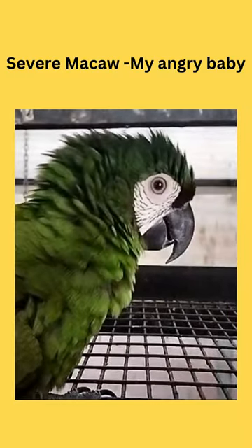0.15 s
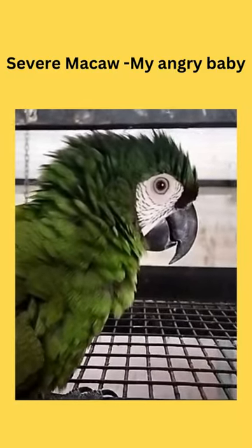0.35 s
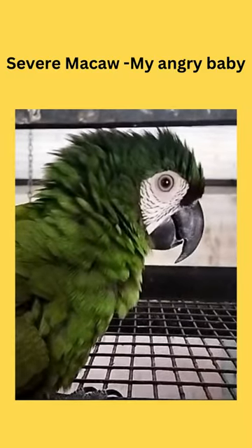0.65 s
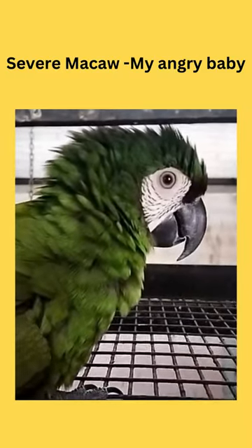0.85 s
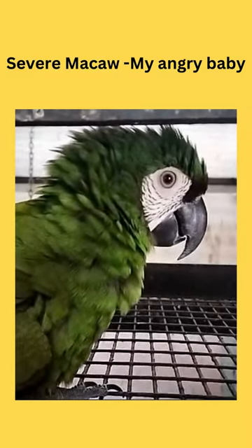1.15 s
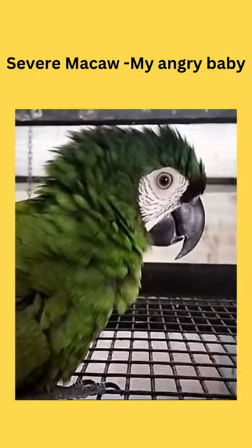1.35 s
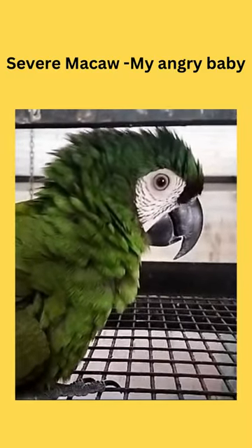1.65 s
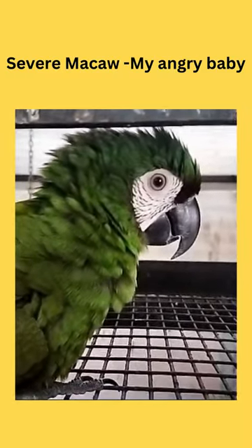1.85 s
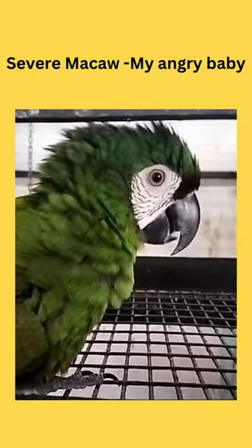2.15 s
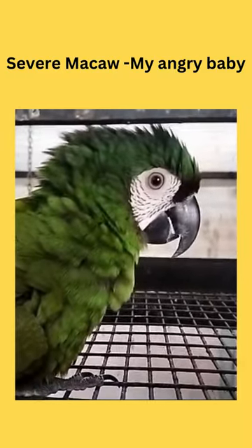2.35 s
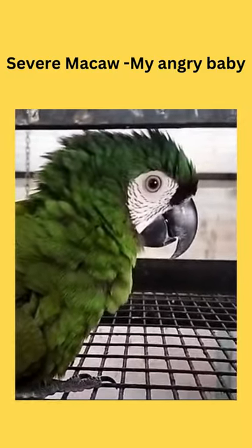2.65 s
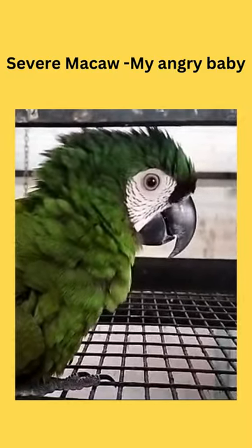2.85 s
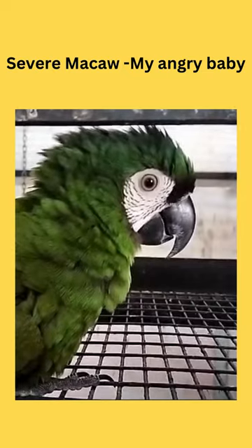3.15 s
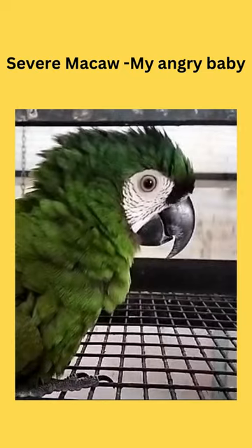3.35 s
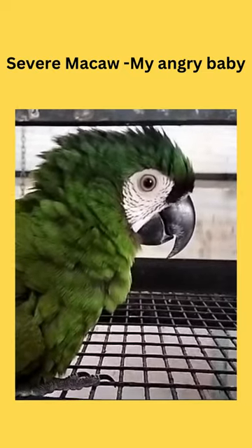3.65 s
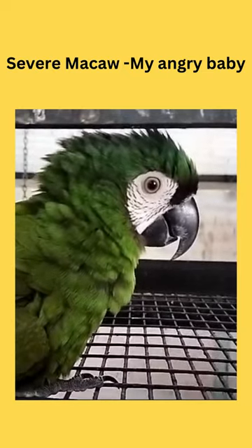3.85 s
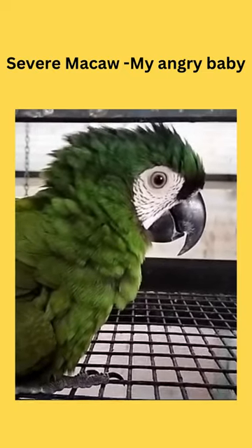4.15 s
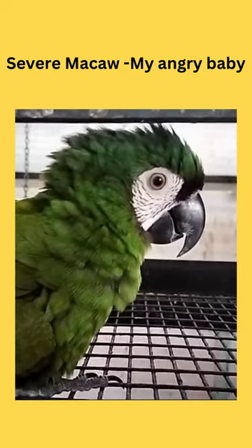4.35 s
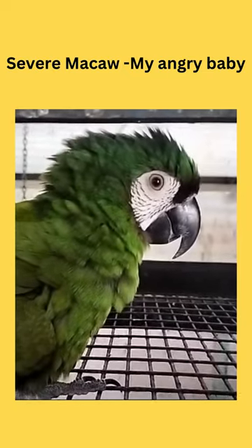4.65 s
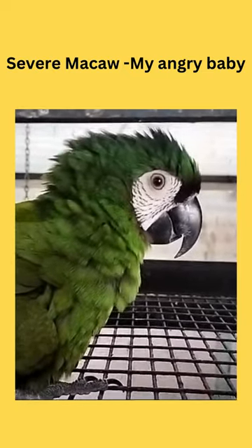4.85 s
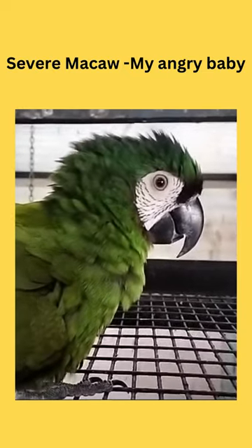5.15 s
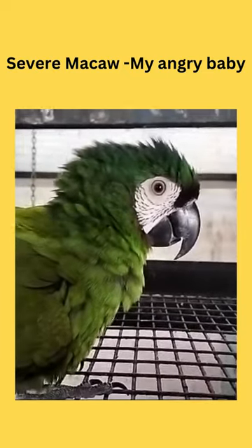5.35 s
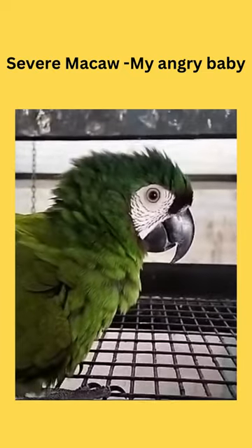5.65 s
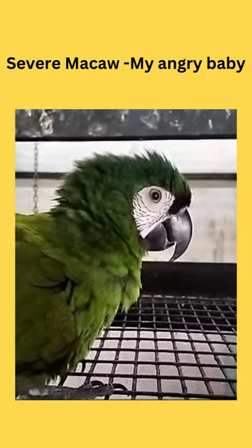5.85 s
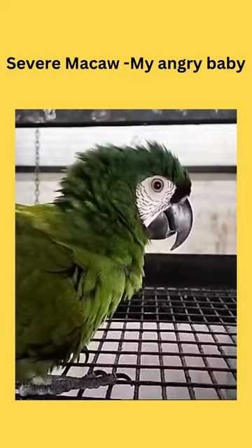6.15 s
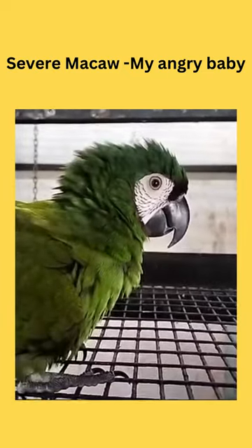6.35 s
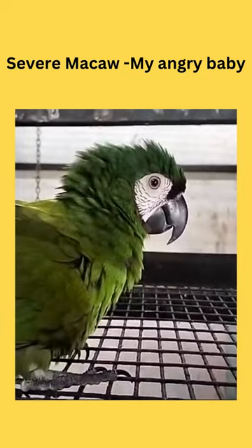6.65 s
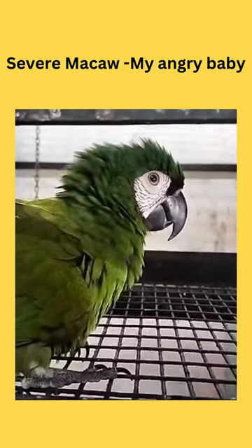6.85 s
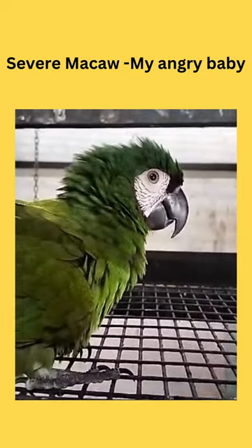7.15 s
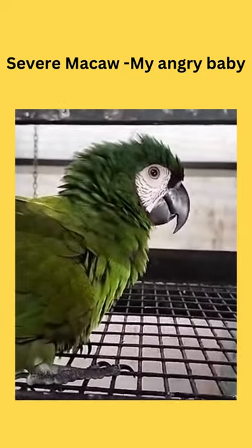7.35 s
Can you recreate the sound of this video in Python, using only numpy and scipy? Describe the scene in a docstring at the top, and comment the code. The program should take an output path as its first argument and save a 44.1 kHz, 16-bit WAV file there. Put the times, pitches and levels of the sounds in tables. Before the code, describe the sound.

Short, hoarse bird screeches come from across a hard-walled room from the start and recur throughout, over a low rumble and faint hiss. A macaw close to the microphone answers with harsh rasps from 0.3 seconds, then a loud yelp and shrill screech near 0.9. It gives a brief rattle at 1.4 seconds, squawks loudly again at 1.9 and follows with nasal croaks just after 2. Another sharp squawk lands at about 3.3 seconds, then quieter rasps and distant calls fill the gap until more croaks at 5. Loud rasps and screeches cluster from 5.4 to 5.9 and from 6.5 to 6.9 seconds, and weaker calls carry on to the end at about 7.5. Soft puffs of air bump the left side of the microphone near 2, 3.3, 5.9 and 6.8 seconds. The room rings briefly after every call.

```python
"""A macaw screeches across a hard-walled room, over low rumble and faint hiss. The near bird, on its wire
cage just before the microphones, answers: its membranes go chaotic in rasps, then yelp and screech.
At 1.4 s its voice slows to a rattle; at 2 s air bumps the left mic, and nasal croaks follow, again at 5 s.
Near and far birds squawk on to the end. The room rings after every call, and the recorder ducks the
rumble after the loudest ones."""
import sys
import numpy as np
from scipy import signal
from scipy.fft import rfft, irfft, next_fast_len
from scipy.io import wavfile
from scipy.ndimage import uniform_filter1d, minimum_filter1d, map_coordinates

SR = 44100
rng = np.random.default_rng(int(sys.argv[2]) if len(sys.argv) > 2 else 0)


def transcribe(signal):
    """Save signal, clipped to [-1, 1], as a 16-bit WAV file at the path in sys.argv[1]."""
    frames = np.atleast_2d(signal).T
    limited = np.clip(frames, -1, 1)
    pcm = np.round(limited * 32767).astype(np.int16)
    wavfile.write(sys.argv[1], SR, pcm)


N = 331632


def amp(db):
    """Decibels to gain."""
    return 10 ** (np.asarray(db) / 20)


def unit(x):
    """Scale to rms 1."""
    return x / np.sqrt(np.mean(x ** 2) + 1e-20)


def along(points, hz):
    """Read (frequency, value) breakpoints on a log axis."""
    f, v = np.transpose(points)
    return np.interp(np.log(hz + 1), np.log(f + 1), v)


def glide(first, last, progress):
    """A linear ramp over the course of a call."""
    return first + (last - first) * progress


def wobble(rate, size):
    """A smooth random modulator with rate knots a second."""
    knots = rng.standard_normal(8192)
    return map_coordinates(knots, [np.arange(size) * rate / SR], mode="wrap")


def filtered(x, response):
    """Filter x by a gain given as a function of frequency."""
    size = x.shape[-1]
    padded = next_fast_len(size + 4096)
    return irfft(rfft(x, padded) * response(np.fft.rfftfreq(padded, 1 / SR)), padded)[..., :size]


def coloured(x, spectrum):
    """x through an EQ curve, at rms 1."""
    return unit(filtered(x, lambda hz: amp(along(spectrum, hz))))


def add(track, start, x):
    """Mix x into the track at a time."""
    part = track[round(start * SR):][:len(x)]
    part += x[:len(part)]


def call(start, rise, fall, swell_db, edge=.008):
    """A call's times, soft gate, 0-1 progress and dB swell; swell_db is (start, end) under the peak."""
    peak, end = start + rise, start + rise + fall
    t = np.arange(max(int((start - edge) * SR), 0), min(int((end + edge) * SR), N)) / SR
    gate = np.sqrt(np.clip(np.minimum(t - start + edge, end + edge - t) / (2 * edge), 0, 1))
    progress = np.interp(t, [start, end], [0, 1])
    swell = np.interp(t, [start, peak, end], [-swell_db[0], 0, -swell_db[1]])
    return t, gate, progress, swell


def cycles(pitch, jitter, jitter_rate, waver, waver_rate):
    """Phase of a membrane whose pitch trembles quickly and wavers more slowly."""
    drift = jitter * wobble(jitter_rate, len(pitch)) + waver * wobble(waver_rate, len(pitch))
    return 2 * np.pi * np.cumsum(pitch * np.exp(drift)) / SR


def flutter(rate, depth_db, size):
    """Uneven tremolo of the air stream, at rms 1."""
    phase = 2 * np.pi * np.cumsum(rate * np.exp(0.418 * wobble(rate, size))) / SR
    return unit(amp(depth_db * (np.sin(phase) + 0.47 * wobble(2 * rate, size))))


def brightened(x, treble_db, split_hz):
    """Ride the treble of x against its body, as the beak opens and closes."""
    high = filtered(x, lambda hz: 1 - 1 / (1 + (hz / split_hz) ** 12))
    return unit(x - high) + amp(treble_db) * unit(high)


# stereo image of diffuse sound: f/Hz, left-right correlation
CORRELATION = [(50, 0.73), (150, 1), (700, 0.52), (1500, -0.23), (3500, -0.13), (6000, 0.84), (12000, 0.82)]

def diffuse_stereo(pair):
    """Two unrelated signals, as mid and side, become a partly alike left and right."""
    def weights(hz):
        angle = np.arccos(np.clip(along(CORRELATION, hz), -1, 1)) / 2
        return np.array([np.cos(angle), np.sin(angle)])
    mid, side = filtered(pair, weights)
    return np.array([mid + side, mid - side])


# rumble fader: t/s, level/dB
RUMBLE_FADER = [(0, -37), (0.3, -33), (1.1, -37), (1.8, -36.5), (2.3, -42), (3.1, -37.5), (4.1, -41),
                (5, -40.5), (6.4, -46), (7.0, -50.5), (7.5, -44.5)]
# rumble EQ: f/Hz, level/dB
RUMBLE_EQ = [(15, -49), (25, -20), (65, -4), (96, -8.5), (140, 4), (184, 0.5), (209, -6.5), (282, -3.5),
             (330, -7.5), (453, -10.5), (514, -10.5), (867, -13.5), (1100, -16), (1430, -12.5),
             (2420, -120)]
# hiss EQ: f/Hz, level/dB
HISS_EQ = [(500, -8.5), (1500, 5), (4000, 8.5), (8000, -16), (14000, -17.5)]

def room_tone():
    """The bed: a slowly drifting low rumble and a faint, steady hiss."""
    fader_db = np.interp(np.arange(N) / SR, *np.transpose(RUMBLE_FADER))
    rumble = coloured(diffuse_stereo(rng.standard_normal((2, N))), RUMBLE_EQ)
    hiss = coloured(diffuse_stereo(rng.standard_normal((2, N))), HISS_EQ)
    return amp(fader_db - 1.5) * rumble + amp(-41.5) * hiss


# screech partials: multiple of the pitch, level/dB
SCREECH_PARTIALS = [(.5, -49), (.75, -28), (1, 0), (1.25, -35), (1.5, -13), (1.75, -10.5), (2, 1.5),
                    (2.5, -25), (3, -10.5), (4, -19), (5, -25.5), (6, -33)]
# throat and beak formants, for screech breath and for rasps: f/Hz, level/dB
THROAT_EQ = [(410, -61), (700, -51), (1080, -9), (1370, -15.5), (1900, -5), (2080, -7), (2510, -2.5),
             (3070, -12), (3720, -1), (4010, -0.5), (4550, -1), (6990, -5.5), (8450, -13.5), (11300, -18.5),
             (14400, -26)]

def screeches(cues, swell_db, edge, jitter, waver, air_db, tilt_db):
    """A high, hoarse tone; repeated period doubling puts weak lines between its harmonics."""
    out = np.zeros(N)
    for start, rise, fall, db, start_hz, end_hz, fundamental_db in cues:
        t, gate, progress, swell = call(start, rise, fall, swell_db, edge)
        sway = np.exp(0.0099 * wobble(59.98, len(t)))
        pitch = glide(start_hz, end_hz, progress) / 2 * sway
        phase = cycles(pitch, jitter=jitter, jitter_rate=900, waver=waver, waver_rate=210)
        tone = 0
        for k, level in SCREECH_PARTIALS:
            trim_db = fundamental_db if k <= 1 else tilt_db * max(k - 2, 0)
            slip = (.7 if k < 2 else .35) * wobble(380, len(t))  # the low partials are the hoarsest
            flicker_db = 3 * wobble(400, len(t))
            tone += amp(level + trim_db + flicker_db) * np.sin(k * phase + slip)
        air = amp(air_db) * coloured(rng.standard_normal(len(t)), THROAT_EQ)
        throb = flutter(rate=85, depth_db=1.94, size=len(t))
        add(out, t[0], gate * amp(db + swell + 1.5) * (tone + air) * throb)
    return out


# far screech cues: t/s, rise/s, fall/s, level/dB, 2nd harmonic start f/Hz, end f/Hz, fundamental trim/dB
FAR_SCREECH_CUES = [ (0.0, .005, 0.042, -28, 4080, 4110, 5.5), (0.31, 0.023, 0.068, -27.5, 4390, 4260, 0.5),
                    (0.605, 0.068, 0.097, -23, 4600, 4670, 0.5),
                    (1.24, 0.037, 0.094, -31, 4290, 4470, -4.5),
                    (1.74, 0.085, 0.033, -24.5, 4187, 4180, -2.5), (2.27, .06, 0.043, -30, 4230, 4210, -2),
                    (2.45, 0.064, .18, -29.5, 4170, 4420, -3), (2.74, 0.026, 0.113, -36.5, 4254, 4250, -13),
                    (3.105, 0.076, 0.037, -23.5, 4080, 4070, -1), (3.48, 0.053, 0.066, -34, 4175, 4044, -6),
                    (3.83, 0.13, 0.088, -25.5, 4080, 4084, -2.5),
                    (4.04, 0.05, .08, -28.5, 4240, 4090, -3.5), (4.2, 0.054, 0.11, -24, 4024, 4210, -3),
                    (4.38, 0.0403, 0.069, -27, 4494, 4620, 2.5), (4.745, .02, 0.045, -30, 4230, 4280, -22),
                    (5.65, .07, 0.021, -26, 4120, 3940, -5.5), (5.97, 0.044, .06, -28, 3910, 3970, -12),
                    (6.24, 0.071, 0.13, -27, 4160, 4165, -4), (6.89, 0.11, 0.053, -22, 4305, 4250, -1),
                    (7.12, .05, 0.085, -41, 4250, 4250, 1), (7.37, 0.028, 0.13, -26, 4594, 4550, -2), ]

def far_screeches():
    """Birds across the room: breathy, unsteady screeches with soft edges."""
    return screeches(FAR_SCREECH_CUES, swell_db=(3, 7), edge=.025,
                     jitter=.018, waver=.024, air_db=-13.5, tilt_db=1.1)


# rasp cues: t/s, rise/s, fall/s, level/dB, resonance start f/Hz, end f/Hz, treble start/dB, end/dB
RASP_CUES = [ (0.3, 0.046, 0.08, -28, 3584, 3610, -1.5, 2.5),
             (0.389, 0.067, .135, -18.5, 3060, 2817, -10.5, -11),
             (0.872, 0.019, 0.041, -16.5, 3228, 3200, -21, 7),
             (1.429, 0.027, 0.085, -28.5, 2800, 2920, -30, -29),
             (1.53, 0.041, 0.041, -21, 3045, 3130, -13, -11),
             (1.828, 0.025, 0.09, -15.5, 2677, 3098, -17.5, 7.5),
             (2.369, 0.0068, .05, -17, 2775, 2647, -4.5, -25),
             (2.799, 0.053, 0.17, -33, 3090, 2740, -5.5, -3),
             (3.035, 0.053, 0.031, -32, 3020, 3390, -6.5, 5),
             (3.206, .015, 0.042, -13.5, 2790, 3380, -9, -12),
             (3.24, 0.025, .025, -18, 3315, 3267, 0.5, 2.5), (4.031, 0.12, 0.14, -28, 3260, 3420, -3, -6),
             (4.331, 0.094, 0.21, -33, 3010, 2924, 1.5, -5), (4.78, 0.074, 0.15, -30, 3027, 2706, -4.5, -9),
             (5.404, 0.049, 0.046, -20.5, 3070, 3060, -13.5, -11),
             (5.485, 0.057, 0.094, -16.5, 3160, 3247, -11.5, -10.5),
             (5.742, 0.064, 0.11, -14.5, 2877, 3345, -11.5, -0.5),
             (6.533, 0.069, 0.087, -17.5, 3025, 3372, -11, 1.5),
             (6.69, 0.035, 0.054, -20, 3264, 3274, -15, 1),
             (7.129, 0.081, 0.092, -31, 3085, 3150, -13, -13),
             (7.399, 0.087, 0.037, -27, 2880, 2810, -26, -15), ]
TREBLE_FOLLOWS = 0.45  # share of the swell that the treble follows

def rasps():
    """Driven hard, the membranes go chaotic around one resonance; most rasps brighten as the beak opens."""
    out = np.zeros(N)
    for start, rise, fall, db, start_hz, end_hz, start_treble_db, end_treble_db in RASP_CUES:
        t, gate, progress, swell = call(start, rise, fall, swell_db=(8, 11), edge=.014)
        treble_db = glide(start_treble_db, end_treble_db, progress) - (1 - TREBLE_FOLLOWS) * swell
        pitch = glide(start_hz, end_hz, progress) / 4
        phase = cycles(pitch, jitter=.04, jitter_rate=800, waver=.05, waver_rate=170)
        pulses = unit(sum(np.cos(k * phase + .7 * wobble(420, len(t))) for k in range(1, 19)))
        air = .35 * rng.standard_normal(len(t))
        # the resonance picks out the fourth partial, and the octave below it
        ring = .9 * np.sin(4 * phase) + .2 * np.sin(2 * phase)
        voice = brightened(coloured(pulses + air, THROAT_EQ) + ring, treble_db - 4.5, split_hz=4950)
        throb = flutter(rate=135, depth_db=3, size=len(t))
        add(out, t[0], gate * amp(db + swell + 2) * voice * throb)
    return out


# yelp cues: t/s, rise/s, fall/s, level/dB, pitch start f/Hz, end f/Hz, fundamental trim/dB
YELP_CUES = [ (0.641, 0.062, 0.074, -35.5, 1493, 1575, 14), (0.831, 0.03, 0.027, -12.5, 1545, 1499, -3),
             (1.173, .01, 0.055, -33.5, 1500, 1526, -22), (1.559, 0.033, 0.06, -20, 1543, 1534, 2.5),
             (1.828, 0.028, 0.022, -30.5, 1330, 1377, -2), (2.375, 0.044, .022, -19, 1464, 1122, -2.5),
             (2.761, 0.037, 0.068, -29.5, 1624, 1534, -18), (3.215, 0.0417, 0.0157, -17.5, 1486, 1599, -7),
             (4.745, 0.013, 0.049, -32.5, 1620, 1694, -28), (5.771, 0.06, 0.015, -20.5, 1520, 1660, -17),
             (7.07, 0.012, 0.077, -23, 1511, 1547, 2), ]
# yelp harmonics: multiple of the pitch, level/dB
YELP_HARMONICS = [(1, -5), (2, 0), (3, -5.5), (4, -11.5), (5, -18), (6, -25), (7, -26), (8, -35)]

def yelps():
    """Short, cleaner notes from the membranes, most of them strongest in the second harmonic."""
    out = np.zeros(N)
    for start, rise, fall, db, start_hz, end_hz, fundamental_db in YELP_CUES:
        t, gate, progress, swell = call(start, rise, fall, swell_db=(9, 10))
        pitch = glide(start_hz, end_hz, progress)
        phase = cycles(pitch, jitter=.014, jitter_rate=700, waver=.014, waver_rate=140)
        tone = 0
        for k, level in YELP_HARMONICS:
            trim_db = fundamental_db if k == 1 else 0
            flicker_db = 3 * wobble(300, len(t))
            tone += amp(level + trim_db + flicker_db) * np.sin(k * phase)
        throb = flutter(rate=150, depth_db=2, size=len(t))
        add(out, t[0], gate * amp(db + swell + 2) * tone * throb)
    return out


# near screech cues: t/s, rise/s, fall/s, level/dB, 2nd harmonic start f/Hz, fundamental trim/dB
NEAR_SCREECH_CUES = [ (0.885, 0.0566, 0.0642, -14, 4414, -6.5), (1.905, 0.0547, 0.0624, -15.5, 4400, -4),
                     (3.265, 0.0473, 0.0673, -13.5, 4662, -5.5), (5.835, 0.058, 0.058, -15, 4120, -5),
                     (6.56, 0.086, .095, -17, 4492, -0.5), (6.755, 0.061, 0.076, -15, 4410, -8), ]
SCREECH_SAG = .06  # share of the pitch lost by the end

def near_screeches():
    """Loud, hard-edged screeches that sag in pitch as the breath runs out."""
    sagging = [(start, rise, fall, db, hz, hz * (1 - SCREECH_SAG), fundamental_db)
               for start, rise, fall, db, hz, fundamental_db in NEAR_SCREECH_CUES]
    return screeches(sagging, swell_db=(4.5, 5.5), edge=.008,
                     jitter=.009, waver=.018, air_db=-21, tilt_db=.8)


# rattle cues: t/s, length/s, level/dB
RATTLE_CUES = [(1.355, .095, -14.5), (2.337, .026, -16)]
# throat formants of a rattle: f/Hz, level/dB
RATTLE_EQ = [(530, -51), (900, -13.5), (1470, -2), (1630, -12), (2290, 7.5), (3270, -6), (3890, 5),
             (4520, -9), (6680, -15), (12000, -35), (15600, -66), (22000, -120)]
PULSE_GAP_S, PULSE_ATTACK_S, PULSE_T60_S = .0171, .0007, .05

def rattles():
    """Slowed right down, the voice falls apart into single rough pulses."""
    out, t = np.zeros(N), np.arange(SR // 15) / SR
    envelope = amp(-60 * t / PULSE_T60_S) * (1 - np.exp(-t / PULSE_ATTACK_S))
    for start, length, db in RATTLE_CUES:
        for onset in np.arange(start, start + length, PULSE_GAP_S):
            add(out, onset, amp(db) * envelope * coloured(rng.standard_normal(len(t)), RATTLE_EQ))
    return out


# air bump cues: centre t/s, half-width/s, level/dB
BUMP_CUES = [(1.964, 0.022, -30), (3.326, 0.042, -24.5), (5.9, 0.05, -31.5), (6.804, 0.1, -34.5)]

def air_bumps():
    """Puffs of air hit the left mic: soft, bass-heavy thumps."""
    t = np.arange(N) / SR
    swell = sum(amp(db) * np.exp(-((t - centre) / width) ** 2) for centre, width, db in BUMP_CUES)
    thump_eq = [(30, -3), (100, -3.5), (400, -6), (900, -19.5), (2500, -60)]  # f/Hz, level/dB
    return np.outer([1, 0], swell * coloured(rng.standard_normal(N), thump_eq))


# croak cues, several run together: t/s, rise/s, fall/s, level/dB, pitch start f/Hz, end f/Hz, treble/dB
CROAK_CUES = [ (2.035, 0.056, 0.023, -20.5, 761, 1064, -5.5), (2.1, .035, 0.095, -17.5, 727, 704, -9),
              (2.218, 0.029, 0.021, -18, 774, 838, -12), (5.02, .012, .008, -22, 600, 600, -4),
              (5.041, 0.0045, 0.013, -11.5, 747, 757, -2.5), (5.057, 0.0113, .068, -13.5, 702, 639.6, -2.5),
              (5.142, 0.061, .016, -15, 656.5, 785.5, -4), ]
# throat formants of a croak: f/Hz, level/dB
CROAK_EQ = [(260, -67), (450, -13), (675, -10), (929, -7.5), (1120, -3.5), (1730, 1.5), (2060, 6.5),
            (2450, -4.5), (3090, -3.5), (3850, -7.5), (4580, 6.5), (9180, -15), (10200, -32), (12100, -9.5),
            (14400, -26)]

def croaks():
    """The near bird's low, nasal croaks: uneven pulses and pulsed air through its throat."""
    out = np.zeros(N)
    for start, rise, fall, db, start_hz, end_hz, treble_db in CROAK_CUES:
        t, gate, progress, swell = call(start, rise, fall, swell_db=(7, 10), edge=.004)
        pitch = glide(start_hz, end_hz, progress)
        phase = cycles(pitch, jitter=.04, jitter_rate=600, waver=.035, waver_rate=160)
        # the k * k phase offset smears each pulse
        pulses = unit(sum(np.cos(k * phase + .25 * k * k + .35 * wobble(350, len(t)))
                          for k in range(1, 20)))
        air = .4 * (1 + np.cos(phase)) * rng.standard_normal(len(t))
        voice = brightened(coloured(pulses + air, CROAK_EQ), treble_db - 2, split_hz=4100)
        add(out, t[0], gate * amp(db + swell + 2.5) * voice)
    return out


def early_reflections(x, echo_db, count=14):
    """x plus weak slaps off the cage tray and the nearest walls, different at each mic."""
    taps = np.zeros((2, SR // 20))
    for side in taps:
        delay_s = rng.uniform(.002, .035, count)
        side[(delay_s * SR).astype(int)] = rng.choice([-1, 1], count) * np.exp(-delay_s / 0.018)
        side *= amp(echo_db) / np.linalg.norm(side)
    taps[:, 0] = 1  # the direct sound
    return signal.fftconvolve(x[None], taps / np.linalg.norm(taps[0]), axes=1)[:, :N]


# reverb time of the room: f/Hz, t60/s
ROOM_T60 = [(300, 1.1), (1200, 0.76), (2200, 1.004), (4200, 0.74), (7000, 0.84), (13000, 0.47)]

def reverb(x):
    """The hard walls ring: a diffuse tail in which each frequency dies at its own speed."""
    hz, t, noise = signal.stft(rng.standard_normal((2, SR + SR // 4)), SR, nperseg=256)
    decay = amp(-60 * t / along(ROOM_T60, hz)[:, None])
    tail = diffuse_stereo(signal.istft(noise * decay, SR, nperseg=256)[1])
    tail *= 1 - np.exp(-np.arange(tail.shape[1]) / SR / 0.00093)  # quick fade-in
    return signal.fftconvolve(x[None], tail / np.linalg.norm(tail[0]), axes=1)[:, :N]


# phase between the mics: f/Hz, left lead/rad
MIC_PHASE = [(600, 0.91), (1400, -2.22), (2200, -1.48), (3300, -1.5), (4400, -1.83), (5600, -0.1)]
# pan of the birds: f/Hz, left minus right level/dB
MIC_BALANCE = [(700, -0.5), (1600, -4), (2600, -8), (4000, -6), (5000, 2), (6500, 2.5), (7600, -0.5),
               (9500, 6), (11000, 10.5), (13000, 2)]

def scene():
    """The mix: the near bird fairly dry, its far companions much wetter, all over the room tone."""
    near = near_screeches() + rasps() + yelps()
    low_calls = croaks() + rattles()
    far = far_screeches()
    early = early_reflections(amp(-1) * (near + low_calls), echo_db=-5.5)
    early += early_reflections(amp(-1.5) * far, echo_db=-4.5)
    phased = filtered(early, lambda hz: np.exp(np.outer([.5j, -.5j], along(MIC_PHASE, hz))))
    send = amp(-9.5) * near + amp(-10) * low_calls + amp(-3.5) * far
    birds = filtered(phased + reverb(send), lambda hz: amp(np.outer([.5, -.5], along(MIC_BALANCE, hz))))
    return birds + room_tone() + air_bumps()


DUCK_THRESHOLD_DB, DUCK_DB_PER_DB, DUCK_BELOW_HZ = -21.5, 1.29, 806
DUCK_LAG_S, DUCK_RELEASE_DB_PER_S = 0.12, 45

def duck_bass(x):
    """The recorder's suppressor: loud sound pushes the bass down after a lag; it returns steadily."""
    t = np.arange(N) / SR
    power = uniform_filter1d(np.mean(x ** 2, axis=0), size=SR // 10)
    level_db = 10 * np.log10(np.abs(power) + 1e-12)
    sidechain_db = np.interp(t - DUCK_LAG_S, t, level_db)
    wanted_db = DUCK_DB_PER_DB * np.maximum(sidechain_db - DUCK_THRESHOLD_DB, 0)
    release_db = DUCK_RELEASE_DB_PER_S * t
    cut_db = np.maximum.accumulate(wanted_db + release_db) - release_db
    bass = filtered(x, lambda hz: 1 / (1 + (hz / DUCK_BELOW_HZ) ** 6))
    return x + (amp(-cut_db) - 1) * bass


CEILING, HIGH_CUT_HZ = .85, 14500

def record(dry):
    """The recorder chain: bass ducker, fast peak limiter, brick-wall high cut."""
    ducked = duck_bass(dry)
    needed_gain = np.minimum(1, CEILING / (np.abs(ducked).max(axis=0) + 1e-9))
    gain = uniform_filter1d(minimum_filter1d(needed_gain, size=129), size=129)
    return filtered(ducked * gain, lambda hz: hz < HIGH_CUT_HZ)


dry = scene()
out = record(dry)
transcribe(out)
```